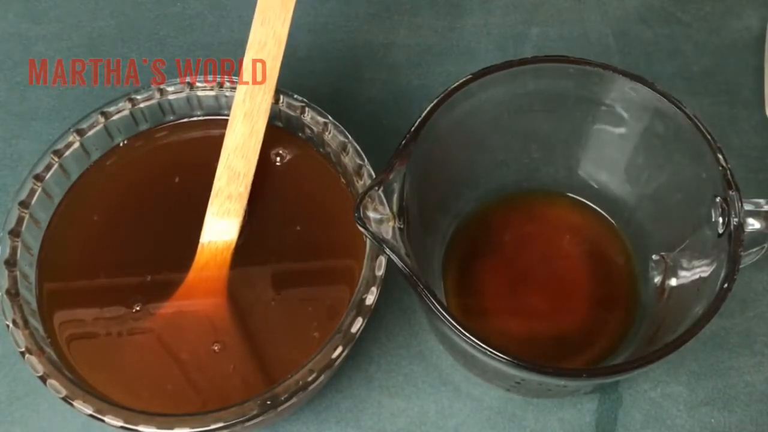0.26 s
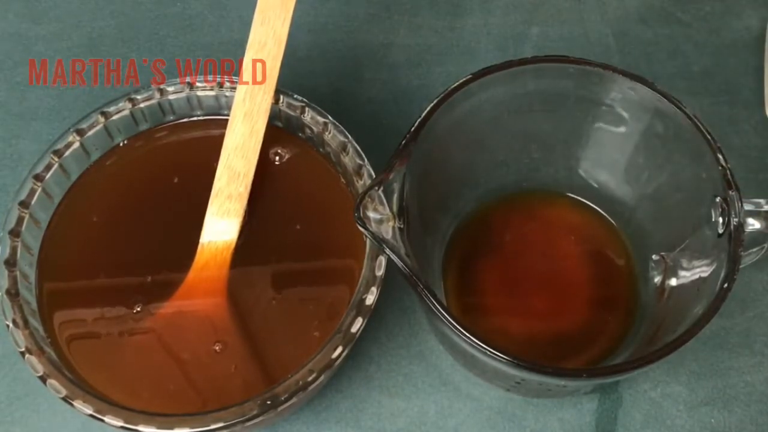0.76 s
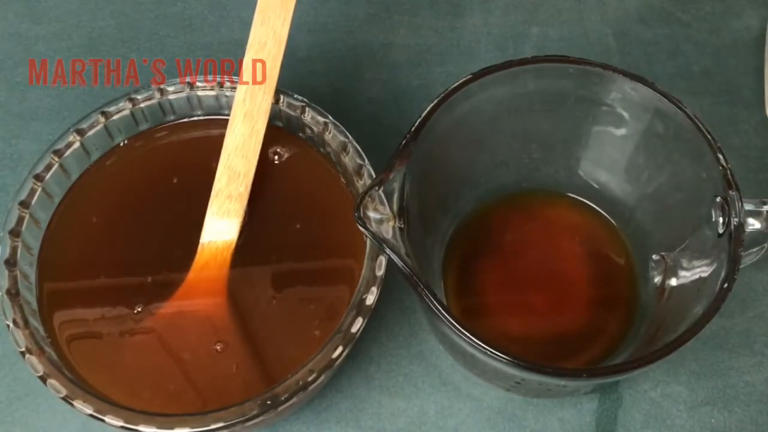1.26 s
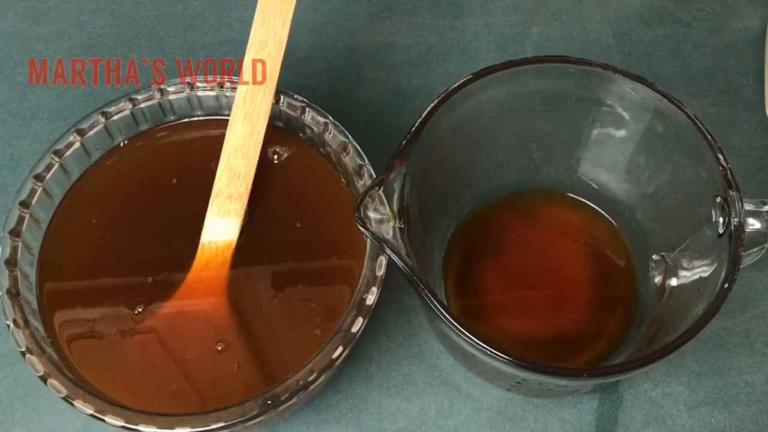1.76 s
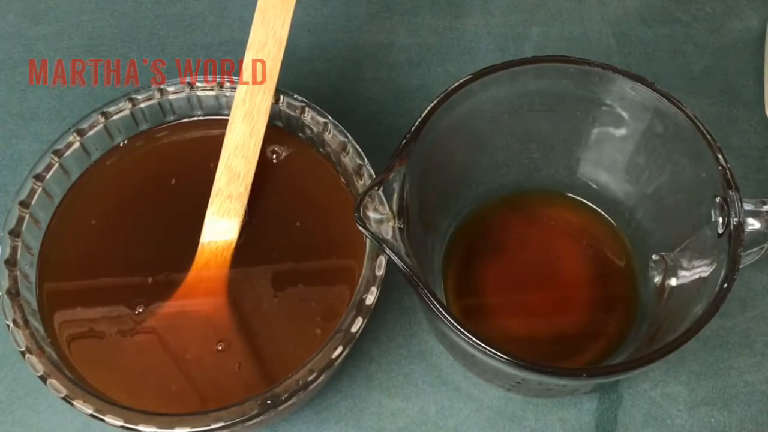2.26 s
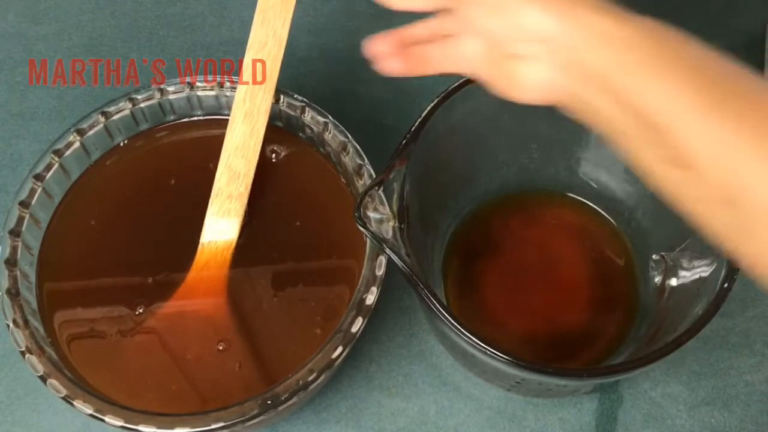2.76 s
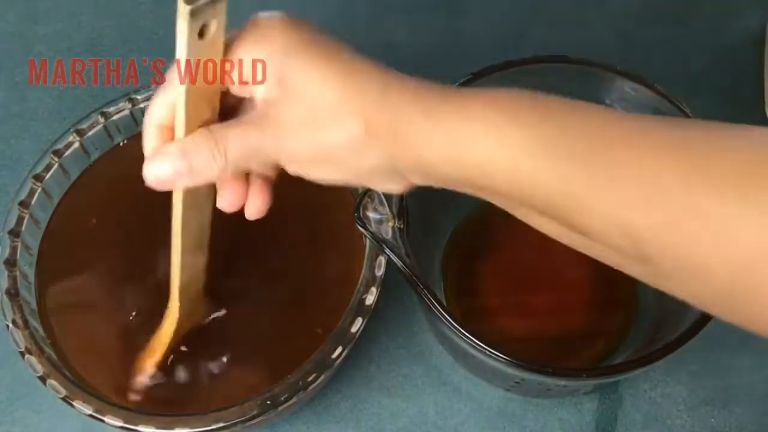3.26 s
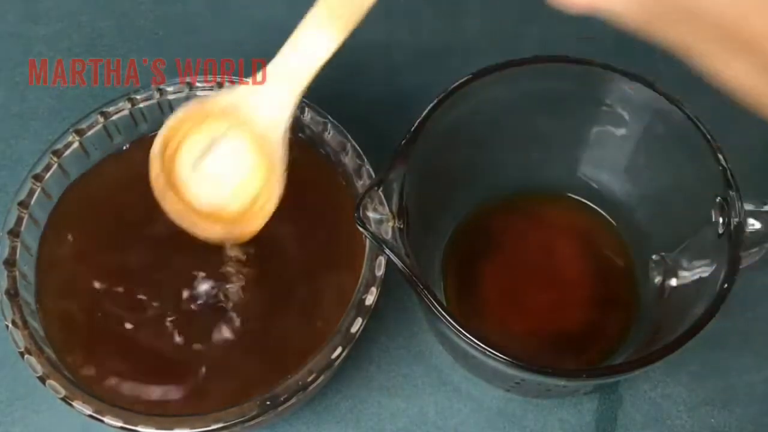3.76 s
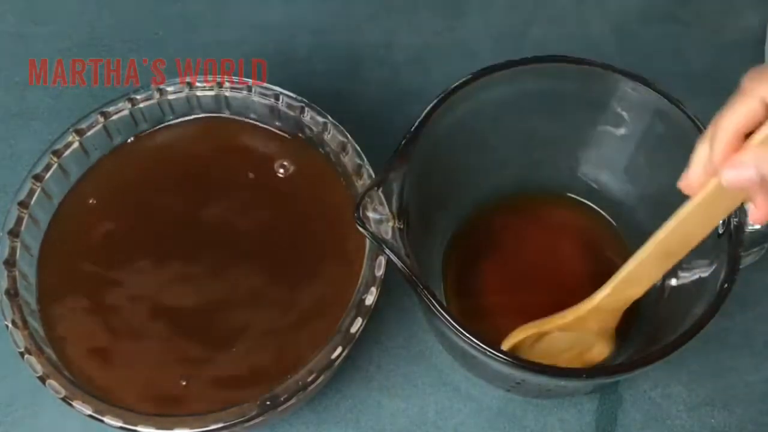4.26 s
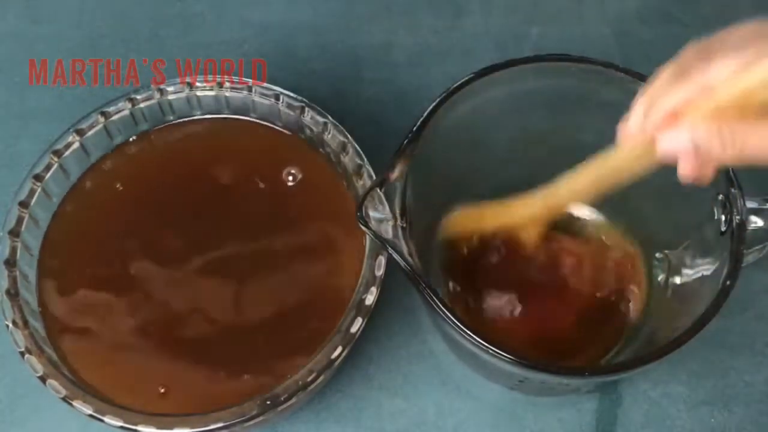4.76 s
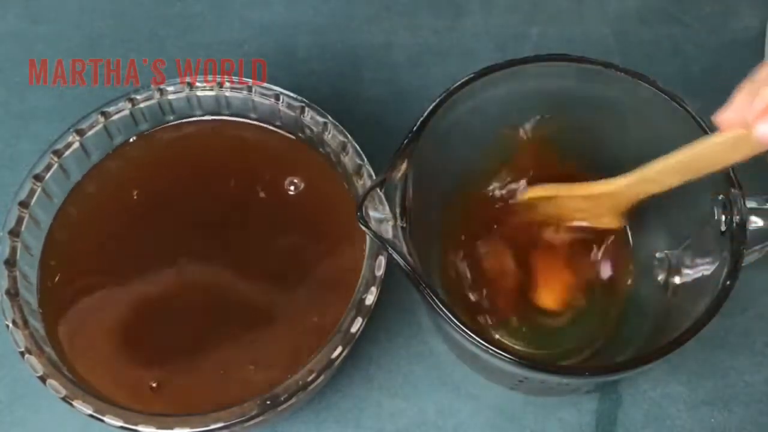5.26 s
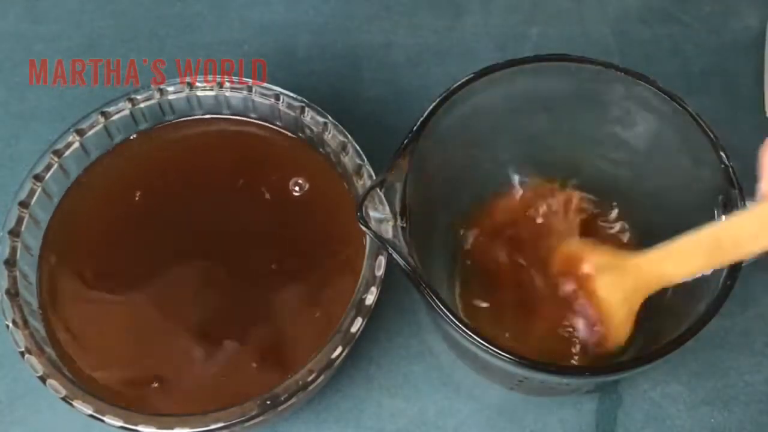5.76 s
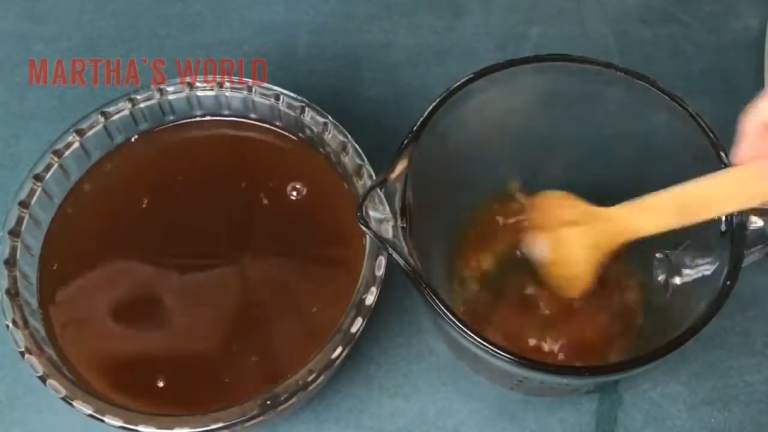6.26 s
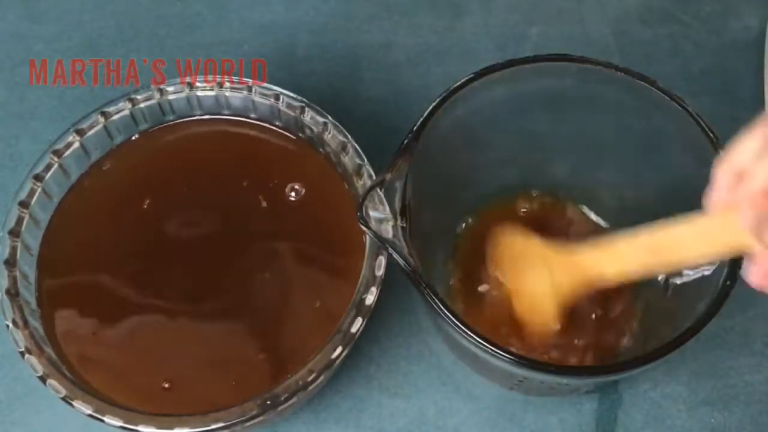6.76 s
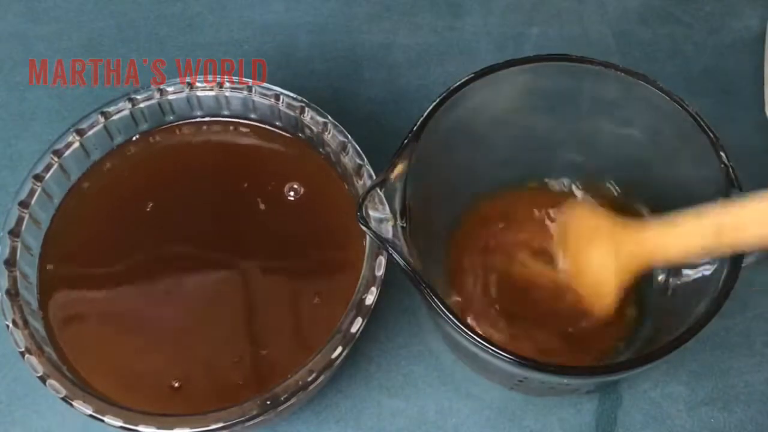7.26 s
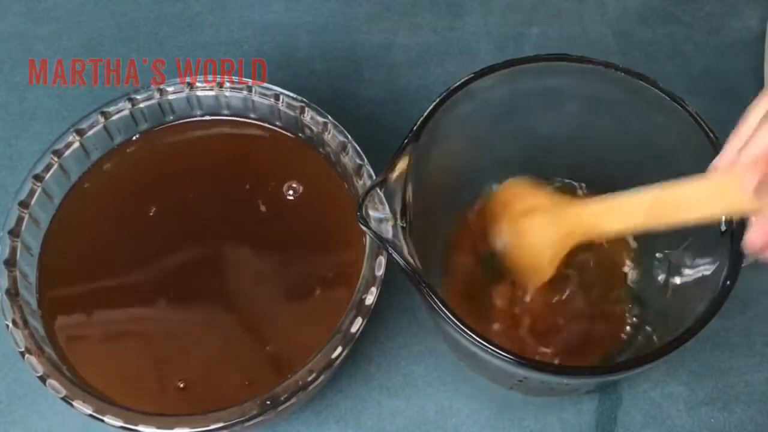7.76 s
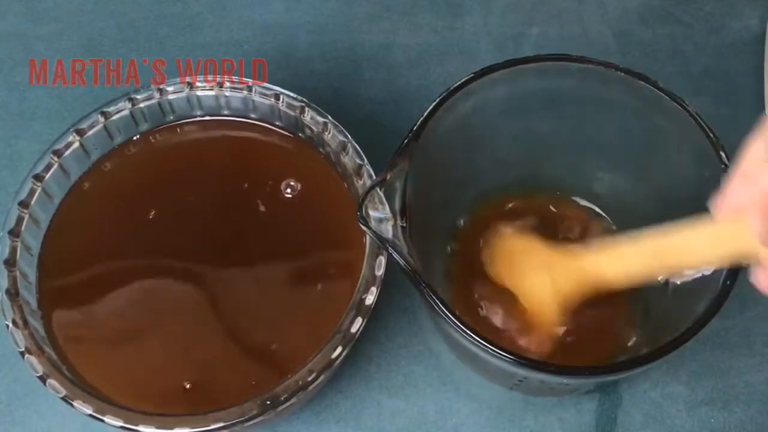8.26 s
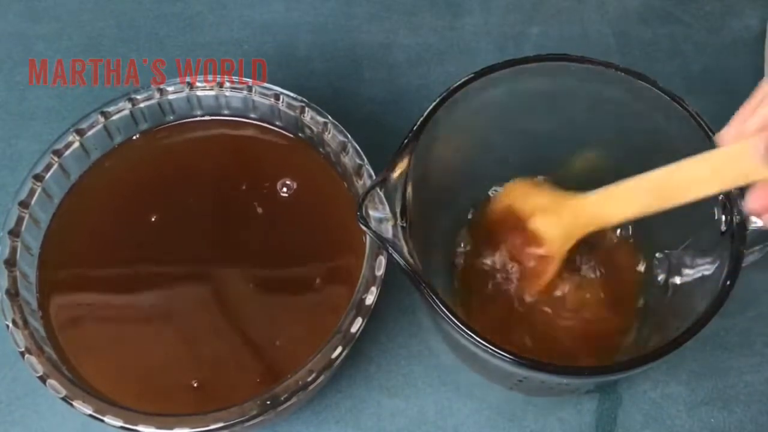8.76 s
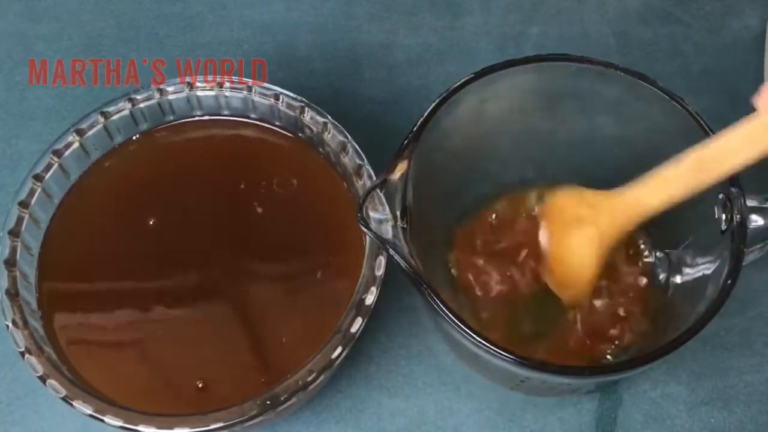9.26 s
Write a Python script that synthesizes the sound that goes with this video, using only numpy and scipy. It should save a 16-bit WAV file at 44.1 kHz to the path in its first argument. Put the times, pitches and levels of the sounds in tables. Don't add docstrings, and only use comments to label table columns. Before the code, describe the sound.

Off-screen clatter and thumps in a humming kitchen give way to close, wet stirring in a glass jug, with irregular ringing spoon knocks.

```python
import sys
import numpy as np
from scipy import signal
from scipy.fft import rfft, irfft, next_fast_len
from scipy.io import wavfile
from scipy.ndimage import map_coordinates

SR = 44100
rng = np.random.default_rng(int(sys.argv[2]) if len(sys.argv) > 2 else 0)


def wav_out(sig):
    wavfile.write(sys.argv[1], SR, np.round(np.clip(np.atleast_2d(sig).T, -1, 1) * 32767).astype(np.int16))


def amplitude_ratio(level_db):
    exponent = np.asarray(level_db, float) / 20
    return 10 ** exponent


N = 419832


def unit(x):
    return x / np.sqrt(np.mean(x ** 2, axis=-1, keepdims=True) + 1e-20)


def along(points, hz):
    f, v = np.transpose(points)
    return np.interp(np.log(hz + 1), np.log(f + 1), v)


def level_curve(rows, silent_db=-120):
    s, db = np.transpose(rows)
    return np.interp(np.arange(N) / SR, s, db, left=silent_db, right=silent_db)


def wobble(rate, size=N):
    knots = rng.standard_normal(int(size * rate / SR) + 4)
    return map_coordinates(knots, [np.arange(size) * rate / SR])


def filtered(x, response):
    n = x.shape[-1]
    m = next_fast_len(n + 8192)
    return irfft(rfft(x, m) * response(np.fft.rfftfreq(m, 1 / SR)), m)[..., :n]


def noise(spectrum, size=N, skirt_db=40):
    (low_hz, low_db), (top_hz, top_db) = spectrum[0], spectrum[-1]
    closed = [(low_hz / 2, low_db - skirt_db), *spectrum, (top_hz * 2, top_db - skirt_db)]
    white = rfft(rng.standard_normal(size))
    return unit(irfft(white * amplitude_ratio(along(closed, np.fft.rfftfreq(size, 1 / SR))), size))


def add(track, s, sound):
    part = track[max(round(s * SR), 0):][:len(sound)]
    part += sound[:len(part)]


def ring(modes, t, scatter_db):
    out = 0
    for hz, db, t60 in modes:
        struck_db = db + rng.normal(0, scatter_db)
        out = out + amplitude_ratio(struck_db - 60 * t / t60) * np.sin(2 * np.pi * hz * t)
    return out


def chirp(start_hz, end_hz, length, rise=0.00065, fade_db=9, tail=0.22):
    t = np.arange(round(2 * length * SR)) / SR
    glide = np.minimum(t / length, 1.08) ** 1.3
    hz = start_hz * (end_hz / start_hz) ** glide
    burst = 1 / (1 + np.exp(np.minimum((t - length) / (tail * length / 2), 50)))
    tone = np.sin(2 * np.pi * np.cumsum(hz) / SR)
    return tone * (1 - np.exp(-t / rise)) * amplitude_ratio(-fade_db * t / length) * burst


# (frequency [Hz], density [dB per Hz])
ROOM_TONE = [(13, -63), (22, -39), (60, 0), (140, -12.5), (200, -8), (370, -18), (1150, -30.5),
             (16500, -54)]
# (centre [Hz], width [Hz], level [dB])
MOTORS = [(64, 14, -2.5), (122.34, 9.6, -11), (193.5, 8, -9)]
# (time [s], level [dB])
HUM = [
    (0, -46.5),
    (3.7, -49),
    (9.52, -45),
]


def appliances():
    hum = np.zeros(N)
    for centre, width, db in MOTORS:
        band = filtered(rng.standard_normal(N), lambda f: 1 / (1 + ((f - centre) / width) ** 2))
        hum += amplitude_ratio(db) * unit(band)
    tone = noise(ROOM_TONE)
    low = filtered(tone, lambda f: 1 / (1 + (f / 400) ** 2))
    return amplitude_ratio(-44) * (tone - low) + amplitude_ratio(level_curve(HUM) - 3.5) * (low + amplitude_ratio(-4) * hum)


# (time [s], peak level [dB], high share [dB], body pitch [Hz])
CLATTER = [(0.0313, -19, -28, 500), (0.0649, -22.5, -16, 1700), (0.119, -24, -22, 1200),
           (0.1269, -15, -20, 2120), (0.157, -25, -12, 1000), (0.216, -33, -25, 3100),
           (0.2545, -33, -40, 500), (0.299, -34, -8, 3500), (0.345, -31, -8, 1200), (0.737, -19, -18, 1300),
           (0.765, -20, -18, 1000), (0.1999, -29.5, -37, 1190), (0.3205, -18, -30, 1140),
           (0.3708, -32, -10, 1360), (0.407, -22, -14, 2000), (0.439, -18.5, -28, 1710),
           (0.4924, -18, -21, 680), (0.5614, -18, -10.5, 1150), (0.634, -27, -16, 1148),
           (0.6883, -30, -25, 1750), (0.7243, -22, -17, 1210), (0.7462, -12, -12.5, 1970),
           (0.8766, -12, -2.5, 1830), (0.8983, -10, -14, 1880), (0.9495, -7.5, -6, 627),
           (1.0255, -22, -30, 2510), (1.1403, -17, -14, 1960), (1.2471, -18, -10, 3720),
           (1.3399, -33.5, -17, 3170), (1.4995, -31, -30, 600), (1.5623, -29, -20, 698),
           (1.6018, -25.5, -29, 1180), (1.7146, -13, -8.5, 2800), (1.893, -32.5, -14, 3210),
           (1.906, -31, -17, 2110), (2.0769, -35, -37, 2010), (2.1271, -35.5, -34, 1530),
           (2.1917, -33, -34, 764)]


def clatter():
    out, t = np.zeros(N), np.arange(8192) / SR
    rattle_db = 4 * wobble(180)
    scuff_until_s, scuff_rise_s = 0.8, 0.0008
    for s, db, high_db, hz in CLATTER:
        low_db = -13 - 0.3 * (high_db + 18)
        colour = [(80, low_db - 25), (200, low_db + 13), (800, low_db + 15.5), (1500, 0.92),
                  (4000, -2.4), (6000, high_db + 6), (15000, high_db - 14)]
        body = noise([(hz / 1.6, -40), (hz / 1.14, -8), (hz, 0), (hz * 1.115, -8), (hz * 1.16, -40)],
                     size=len(t))
        grain_db = np.roll(rattle_db, round(s * SR))[:len(t)]
        if s < scuff_until_s:
            decay = amplitude_ratio(-3 - 60 * t / 0.015) + amplitude_ratio(-3 - 60 * t / 0.05 + grain_db)
            decay = (1 - np.exp(-t / scuff_rise_s)) * decay
        else:
            decay = amplitude_ratio(5 - 60 * t / 0.006) + amplitude_ratio(-6.5 - 60 * t / 0.07 + grain_db)
        hit = noise(colour, size=len(t)) * decay + body * amplitude_ratio(-6 - 60 * t / 0.054)
        add(out, s - 0.0007, amplitude_ratio(db - 6.5) * hit)
    return out


# (frequency [Hz], density [dB per Hz])
THUD = [(32, -45), (58, 1), (140, 0), (250, -2), (360, -12), (580, -1), (900, -10), (2000, -35.5)]
# (time [s], level [dB], t60 [s])
THUMPS = [
    (.045, -34, 0.18),
    (0.439, -28, .2),
    (.737, -33, .15),
    (.95, -32, 0.18),
    (1.714, -20.5, 0.27),
    (3.203, -38, .1),
]


def thumps():
    out, t = np.zeros(N), np.arange(8192) / SR
    for s, db, t60 in THUMPS:
        add(out, s, amplitude_ratio(db - 60 * t / t60) * (1 - np.exp(-t / 0.0026)) * noise(THUD, size=len(t)))
    return out


# (peak time [s], level [dB], high share [dB], time to rise 10 dB [s], time to fall 10 dB [s])
STROKES = [(.08, -49, -9, .3, .17), (.47, -38.5, -11, .12, .13), (.76, -34.5, -10, .11, .045),
           (1.0, -39.6, -9, .15, .065), (1.25, -54, -7, .3, .45), (1.73, -28, -7, .018, .08),
           (1.92, -40, -10, .07, .07), (2.1, -45, -21, .035, .08), (2.52, -57, 3, .09, .35),
           (2.87, -51, 2, .09, .2), (3.0, -44.5, 0, .13, .06), (3.41, -51, -9, .045, .11)]


def rustle():
    t = np.arange(N) / SR
    mid_gain = amplitude_ratio(-80) * (t < 4.14)
    high_gain = mid_gain.copy()
    for s, db, high_db, rise, fall in STROKES:
        swell = amplitude_ratio(db - 10 * np.maximum((s - t) / rise, (t - s) / fall))
        mid_gain += swell
        high_gain += amplitude_ratio(high_db) * swell
    mid = noise([(150, -30), (500, -7), (1200, -3), (1800, 0), (2400, -1), (4000, -6), (8000, -24)])
    high = noise([(3500, -34), (5000, -1), (7000, -1.5), (10500, -9), (16000, -12)])
    fibres = unit(amplitude_ratio(1.5 * wobble(40) + 2.5 * wobble(300)))
    return amplitude_ratio(-2.5) * fibres * (mid_gain * mid + high_gain * high)


# (time [s], length [s], pitch [Hz], level [dB])
SCRAPES = [
    (.64, .08, 1700, -40),
    (2.07, .075, 1600, -43),
    (2.86, .11, 2000, -52),
    (3.39, .08, 1900, -56),
    (4.8, .9, 122, -54),
]


def scrapes():
    out = np.zeros(N)
    for s, length, hz, db in SCRAPES:
        stroke = np.sqrt(np.hanning(round(1.3 * length * SR)))
        band = [(hz / 1.4, -30), (hz / 1.08, -5), (hz * 1.08, -5), (hz * 1.4, -30)]
        add(out, s, amplitude_ratio(db) * stroke * noise(band, size=len(stroke)))
    return out * amplitude_ratio(3 * wobble(70))


# (time [s], peak level [dB], pitch [Hz])
DRIPS = [(3.7306, -35, 4660), (4.565, -31, 3120), (5.0754, -37, 4430), (5.1322, -35, 2500),
         (5.1996, -35, 3500), (5.2405, -33, 4130), (6.7891, -22, 3620), (6.927, -26.5, 4470),
         (7.8507, -24, 4320), (8.5413, -30, 4170), (5.9861, -37, 2600), (5.868, -23, 3500),
         (8.936, -27, 4200), (8.966, -28, 3700), (6.605, -21, 6000), (6.503, -33, 5000), (6.636, -32, 2500),
         (6.944, -29, 4500), (7.225, -33, 4000), (9.006, -24, 3700), (9.085, -30, 3700)]
# (time [s], peak level [dB], pitch [Hz])
PLOPS = [(4.5488, -28.5, 2030), (4.866, -15, 2180), (5.4854, -33, 4800), (5.7904, -25.5, 2140),
         (5.8457, -28, 3500), (5.8665, -14, 6040), (6.033, -18.5, 4050), (6.2089, -20.5, 4600),
         (6.2911, -26, 2030), (6.3696, -29, 2510), (6.4476, -29, 6270), (6.5952, -21, 4130),
         (6.6654, -25.5, 3280), (7.2666, -25.5, 4600), (7.3393, -27, 6050), (7.3958, -23, 2720),
         (7.42, -25, 6700), (7.6654, -29.5, 2420), (7.735, -22.5, 2920), (7.8228, -29, 4100),
         (8.169, -30, 3400), (8.125, -30, 5000), (8.4553, -23.5, 6900), (8.5548, -25, 5990),
         (8.8315, -31, 2850), (8.8508, -15, 6200), (8.851, -17, 3800), (8.943, -20, 2990),
         (8.9767, -15.5, 2850), (9.246, -21, 2020), (9.2894, -22, 8000)]
# (time [s], peak level [dB], pitch [Hz])
SPLASHES = [(4.4755, -30, 3100), (4.6933, -25, 6050), (4.8516, -25, 4490), (5.674, -21, 6820),
            (5.754, -16, 3600), (6.0079, -21, 2640), (6.149, -26, 4600), (6.3022, -22, 2670),
            (7.0092, -28, 8800), (7.072, -25, 3500), (7.1039, -27, 3870), (7.1748, -31, 3260),
            (7.1997, -27, 3220), (7.557, -24, 4020), (7.138, -25, 11000), (7.445, -23, 9500),
            (7.9858, -23.5, 2670), (8.2542, -32, 3480), (8.284, -27, 3900), (8.3649, -30, 3630),
            (8.419, -32.5, 2840), (8.7743, -23, 7800), (9.0313, -10, 10500), (9.0979, -31, 3890),
            (9.182, -17, 5500), (9.207, -22, 9500), (9.3804, -23, 5300), (9.4309, -15, 3300),
            (9.489, -22, 7000)]
# (time [s], peak level [dB], pitch [Hz])
TICKS = [(4.6251, -34, 6780), (5.1005, -34, 4310), (5.1806, -27, 4430), (5.5201, -40, 4860),
         (5.5782, -34, 3480), (5.6032, -31, 3560), (5.6263, -31, 6840), (6.0808, -30, 4470),
         (6.3213, -29, 2790), (6.3324, -28, 3520), (6.3384, -28, 3740), (6.4111, -33, 2500),
         (6.4789, -32, 3530), (6.5462, -34, 4010), (6.864, -31, 3990), (6.9768, -35, 3410),
         (7.2467, -27, 3850), (7.3045, -29, 4800), (7.4084, -24, 3670), (7.4647, -26, 6820),
         (7.5061, -27, 4040), (7.5999, -24, 2890), (7.6174, -28, 5320), (7.7161, -26, 3550),
         (7.7424, -24, 2900), (7.7869, -32, 2590), (7.8624, -29, 4510), (7.9244, -38, 4610),
         (8.5716, -29, 3350), (8.6769, -37, 4690), (8.7492, -30, 3980), (8.7864, -27, 3350),
         (9.3309, -30, 2590), (9.3494, -31, 3720), (9.4514, -23, 4020)]


def drops():
    out, foam, t = np.zeros(N), np.zeros(N), np.arange(4096) / SR
    spread_s, satellite_s, foam_s = 0.0015, 0.04, 0.011
    # (drops, level [dB], spray [dB])
    kinds = [(PLOPS, 0, -24), (SPLASHES, 0, -11), (DRIPS, 0, -16), (TICKS, -5, -13)]
    events = [(s, db + kind_db, hz, spray_db) for kind, kind_db, spray_db in kinds for s, db, hz in kind]
    for s, db, hz, spray_db in events:
        pop = chirp(hz * 0.946, hz * 1.08, 12 / hz, rise=0.00013, fade_db=16)
        add(out, s - 0.0005, amplitude_ratio(db - 8) * pop)
        blob = noise([(hz / 3, -34), (hz / 1.264, -11), (hz, 0), (hz * 1.215, -11), (hz * 2.42, -19),
                      (hz * 4, -30)], size=len(t))
        blob *= amplitude_ratio(db - 8 - 60 * t * hz / 130) * (1 - np.exp(-t / spread_s))
        spray = noise([(1500, -22), (3200, -5), (9000, 0), (16000, -6)], size=len(t))
        spray *= amplitude_ratio(db + spray_db + 5.5 - 60 * t / 0.008)
        add(out, s - 0.0005, blob + spray)
        for later, pitch, size in rng.random(size=(3, 3)):
            small_hz = min(hz * 1.4 ** (2 * pitch - 1), 14000)
            satellite = chirp(small_hz, 1.12 * small_hz, 16 / small_hz, rise=0.0004)
            add(out, s + 0.004 + satellite_s * later, amplitude_ratio(db - 24 + 8 * size) * satellite)
        add(foam, s, amplitude_ratio(min(db, -19) - 25.5) * t / foam_s * np.exp(-t / foam_s))
    return out, foam


# (time [s], wall level [dB], table thud [dB], wood knock [dB], upper modes [dB])
KNOCKS = [(4.1456, -12.5, -12, 1.5, -19), (4.4757, -26, -7, 0, -23), (4.777, -49, 20, -1, -15),
          (4.8, -47, 9, 3.5, -10), (5.333, -61.5, 25, -3, -7), (6.6661, -46, 7.5, 0.5, -8),
          (7.571, -28, 1, -7, -14), (7.5842, -30.5, -1.5, -24, -8), (7.5995, -32, -17, -23, -17),
          (8.9442, -23.5, -3, -3, -10), (8.953, -20, -5, -12, -20), (8.9795, -9.5, -9.5, -4, -4.5),
          (8.9926, -16, 0, 1, -14), (9.2244, -22, 0, -4.5, -15), (9.2449, -17.5, 1, -8.5, -8),
          (9.2582, -14.5, -7, -9, -17)]
HARD_KNOCK = (9.002, -9, -22, -16, -24)
# (frequency [Hz], level [dB], t60 [s])
UPPER = [(2895, -2.5, 0.2), (3045, -6, 0.16), (4452, -16, .16), (5300, -15, 0.14), (5733, -15, .22),
         (6180, -17, 0.11), (8560, -18, .12)]
# (frequency [Hz], level [dB], t60 [s])
WOOD = [(600, -13, 0.1), (690, -14, 0.088), (994, -7, 0.07), (1197, -6, 0.065), (1370, 4, .04),
        (1490, 10, .02), (1568, -8, 0.15), (1900, 3, 0.056), (2456, -5, 0.027)]


def knocks():
    out, long = np.zeros(N), np.arange(SR * 2 // 3) / SR
    t = long[:12288]
    wall_hz, wall_t60 = 1658, 0.6
    partner_hz, partner_t60 = 1715, 0.22
    # (frequency [Hz], level [dB], t60 [s])
    foot, foot_from_s = [(603, -15, 0.3), (991, -13, 0.16), (1184, -13, 0.15)], 8.97
    choke = amplitude_ratio(-6 * (long / 0.07) ** 2)
    for blow in KNOCKS + [HARD_KNOCK]:
        s, db, thud_db, wood_db, upper_db = blow
        partner_db, side = (8.5, -1) if blow is HARD_KNOCK else (-10, 1)
        phase_s = long + round((s - HARD_KNOCK[0]) * SR) / SR
        wall = amplitude_ratio(-13 - 60 * long / wall_t60) * np.sin(2 * np.pi * wall_hz * phase_s)
        partner = ring([(partner_hz, partner_db, partner_t60)], long, scatter_db=0) * choke
        glass = wall + side * partner
        upper = np.zeros(len(t))
        for mode in UPPER:
            shimmer = amplitude_ratio(3 * wobble(60, size=len(t)))
            upper += ring([mode], t, scatter_db=1.5) * shimmer
        upper *= amplitude_ratio(upper_db - 2.5)
        wooden = WOOD + foot if s > foot_from_s else WOOD
        wood = amplitude_ratio(wood_db - 0.8) * ring(wooden, t, scatter_db=1.5)
        thud = amplitude_ratio(thud_db - 3 - 60 * t / 0.19) * noise(THUD, size=len(t))
        crack = noise([(500, -7), (2500, -6), (4000, -12), (15000, -37.5)], size=len(t))
        crack *= amplitude_ratio(upper_db - 2.5 - 60 * t / 0.045)
        add(out, s - 0.001, amplitude_ratio(db) * (1 - np.exp(-long / 0.004)) * glass)
        add(out, s - 0.001, amplitude_ratio(db) * (1 - np.exp(-t / 0.00044)) * (upper + wood + thud + crack))
    return out


# (frequency [Hz], density [dB per Hz])
FIZZ = [(740, -30), (1250, 0), (2040, -10), (3440, -3), (5390, -2.5), (6740, -3), (9000, -8), (16000, -6)]
# (time [s], fizz level [dB])
SLOSH = [(4.3, -66), (4.45, -57), (4.72, -71), (4.97, -58), (5.2, -50), (5.42, -64), (5.65, -48),
         (5.8, -58), (6.0, -53), (6.7, -55), (6.85, -50), (7.45, -49), (8.7, -54), (8.95, -44), (9.5, -46)]


def fizz(foam):
    tiny = np.zeros(N)
    for when, pitch, size in rng.random(size=(2200, 3)):
        hz = 2000 * 5.5 ** pitch
        bubble = chirp(hz, 1.059 * hz, 18 / hz, rise=0.00056)
        add(tiny, 4.3 + 5.2 * when, amplitude_ratio(-2.5 * np.log(size + 0.042)) * bubble)
    hiss = amplitude_ratio(3.5 * wobble(250)) * noise(FIZZ)
    clumps = amplitude_ratio(3 * wobble(30))
    texture = unit(clumps * (unit(hiss) + amplitude_ratio(0.7) * unit(tiny)))
    return (amplitude_ratio(level_curve(SLOSH) - 1.2) + foam) * texture


# (time [s], level [dB], start pitch [Hz], end pitch [Hz], length [s])
BUBBLES = [(4.629, -34.5, 1843, 1930, 0.02), (4.868, -17, 2300, 2750, .008), (4.557, -40, 2900, 3200, .012),
           (4.58, -45, 6800, 7000, .008), (4.607, -46, 3000, 2950, .012), (4.73, -47, 4000, 4050, .008),
           (4.821, -42, 2550, 2700, .01), (6.1, -38, 1330, 1750, .045), (6.282, -34, 1350, 1360, .01),
           (7.426, -36, 4900, 5400, .008), (7.74, -38, 2850, 2950, .025), (8.808, -34, 1520, 1480, .012),
           (8.848, -36, 950, 1050, .015), (9.19, -34, 2800, 3200, .02), (9.31, -38, 3500, 3600, .015),
           (5.459, -44.5, 2000, 2700, 0.023), (5.6, -30, 1050, 2080, 0.036),
           (5.656, -36, 2000, 2170, 0.011), (5.791, -29, 1690, 1470, 0.016),
           (6.009, -24.5, 1330, 1363, 0.037), (6.077, -29.5, 1208, 1330, 0.017),
           (6.21, -35.5, 2180, 2270, 0.017), (6.294, -28, 1263, 3020, 0.039),
           (6.882, -33, 1723, 1620, 0.026), (6.979, -34, 1500, 1700, 0.015), (7.032, -39, 1050, 1200, .02),
           (7.56, -32.5, 995, 1210, 0.026), (8.032, -35, 1702, 1480, 0.016),
           (8.853, -21.5, 1520, 1950, .016), (8.875, -30, 1500, 1650, .018),
           (8.9, -31.5, 1155, 1225, 0.017), (8.909, -26, 1900, 2290, 0.011), (9.134, -30, 2200, 3900, .013),
           (9.185, -36, 1900, 2270, .015), (9.43, -18, 1800, 1900, 0.0075)]


def bubbles():
    out = np.zeros(N)
    for s, db, start_hz, end_hz, length in BUBBLES:
        add(out, s - 0.001, amplitude_ratio(db) * chirp(start_hz, end_hz, length, fade_db=7))
    return out


# (time [s], level [dB], pitch [Hz], t60 [s])
GLUG = (4.868, -30, 2520, .26)


def glug():
    out, t = np.zeros(N), np.arange(SR // 4) / SR
    s, db, hz, t60 = GLUG
    band = [(hz / 1.4, -30), (hz / 1.1, -4), (hz * 1.1, -4), (hz * 1.4, -30)]
    add(out, s, amplitude_ratio(db - 60 * t / t60) * noise(band, size=len(t)))
    return out


# (resonance [Hz], width [Hz], level [dB])
CAVITY = [(1330, 145, 6), (2700, 300, -7), (3500, 264, 1), (4650, 200, 2), (6950, 200, 0)]


def liquid():
    falling, foam = drops()
    wet = falling + bubbles() + glug() + fizz(foam)

    def jug_air(f):
        response = 1
        for centre, width, db in CAVITY:
            damping = 1j * f * width
            response = response + amplitude_ratio(db) * damping / (centre ** 2 - f ** 2 + damping)
        return response

    return amplitude_ratio(-2) * filtered(wet, jug_air)


# (frequency [Hz], t60 [s])
KITCHEN = [(150, 0.5), (1000, 0.41), (4000, 0.3), (14000, 0.22)]
# (time [s], level [dB])
WALLS = [
    (.0055, -11),
    (0.0098, -12.5),
    (.022, -17),
]


def kitchen(x, wet_db):
    hz, t, z = signal.stft(rng.standard_normal(SR // 2), SR, nperseg=256)
    fade = amplitude_ratio(-60 * t / along(KITCHEN, hz)[:, None])
    tail = signal.istft(z * fade, SR, nperseg=256)[1]
    response = amplitude_ratio(wet_db) * np.pad(tail / np.linalg.norm(tail), (SR // 200, 0))
    response[0] = 1
    for s, db in WALLS:
        response[round(s * SR)] += amplitude_ratio(db)
    return signal.fftconvolve(x, response)[:N]


def scene():
    far = kitchen(clatter() + thumps(), wet_db=-10.5) + rustle() + scrapes()
    near = kitchen(liquid(), wet_db=-12) + kitchen(knocks(), wet_db=-14.5)
    return (appliances() + far + near)[None]


def top_cut(x):
    return signal.sosfilt(signal.butter(12, 17000, fs=SR, output="sos"), x)


def record(dry):
    top_hz, shelf_hz, shelf_db = 16900, 15900, -10
    held = dry / (1 + np.abs(dry / 0.98) ** 6) ** (1 / 6)
    mix = filtered(held, lambda hz: (hz < top_hz) * amplitude_ratio(shelf_db * (hz > shelf_hz)))
    return top_cut(mix)


dry = scene()
out = record(dry)
wav_out(out)
```